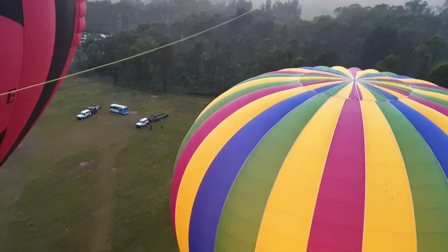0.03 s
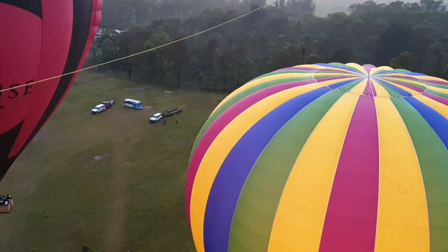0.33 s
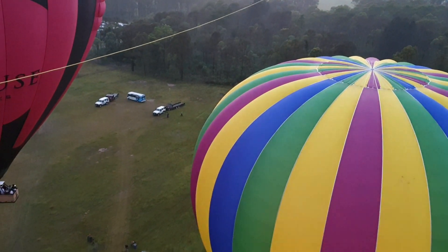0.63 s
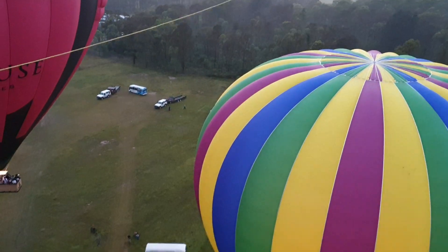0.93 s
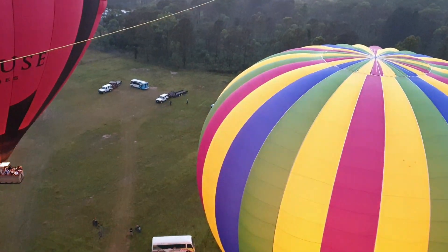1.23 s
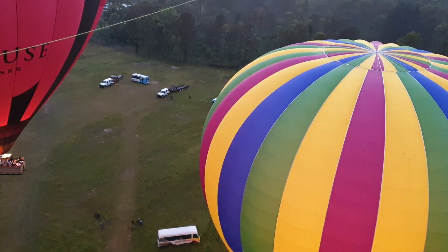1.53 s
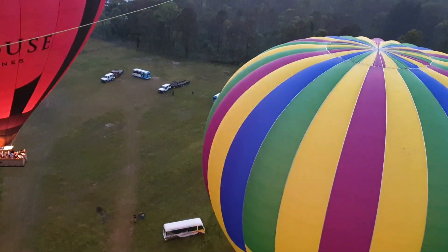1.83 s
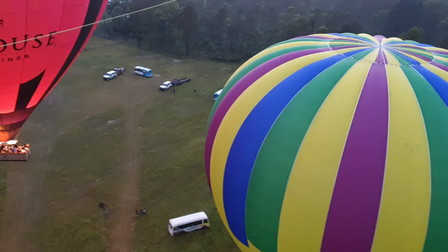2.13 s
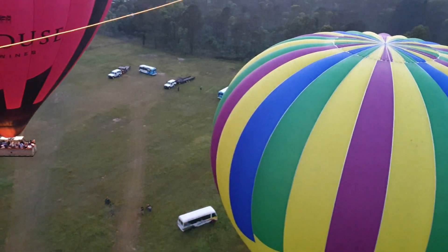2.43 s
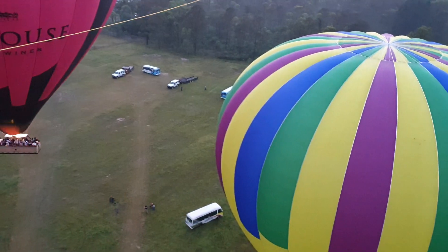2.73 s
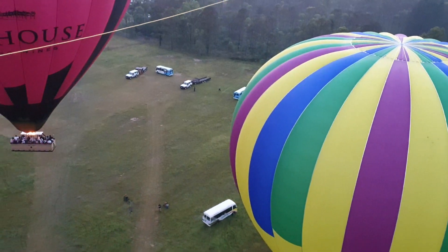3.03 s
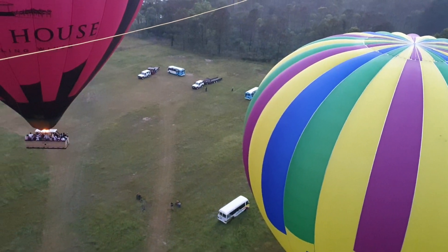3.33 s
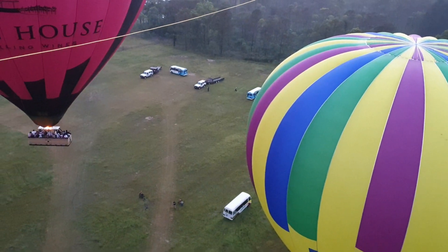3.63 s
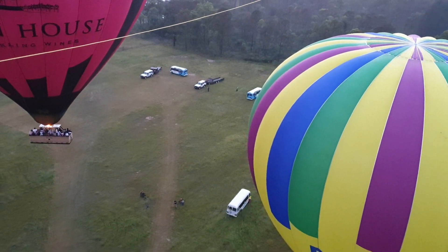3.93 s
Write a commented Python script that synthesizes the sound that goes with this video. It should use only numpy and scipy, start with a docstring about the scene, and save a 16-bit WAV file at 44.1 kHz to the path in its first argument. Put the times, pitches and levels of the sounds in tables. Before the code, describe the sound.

A balloon gas burner roars close by in two blasts with a short pause between.

```python
"""Aboard a hot air balloon. The gas burner overhead is already roaring: its gas flow drives a fluttering
flame and hissing jets, which reach the left microphone first but are louder in the right.
Near 1 s it is throttled shut, the hiss going first and the rumble last. In the pause a neighbouring
balloon's burner comes up, far off, as the recorder's gain recovers. At 2.4 s the gas lights again with
a low whoomp; the roar is briefly louder, then eases as the gain pulls down. Both gain moves are drawn."""
import sys
import numpy as np
from scipy import signal
from scipy.fft import rfft, irfft, next_fast_len
from scipy.io import wavfile
from scipy.ndimage import uniform_filter1d, map_coordinates

SR = 44100
rng = np.random.default_rng(int(sys.argv[2]) if len(sys.argv) > 2 else 0)


def pcm_store(signal):
    """Save signal as 16-bit PCM."""
    levels = np.round(np.clip(np.atleast_2d(signal), -1, 1) * 32767)
    wavfile.write(sys.argv[1], SR, levels.astype(np.int16).T)


N = 176400

# Pulls of the valve. Each row: opening and start of closing in seconds, flame and jet levels in dB.
BURNS = [(-1, .935, -17.1, -23.8), (2.419, 5, -17, -23.9)]
# Tone of the flame, the jets and the far burner. Each row: frequency in Hz, relative level in dB.
FLAME_SPECTRUM = [(20, -26.2), (32, -16.4), (48, -5.7), (62, -2.6), (92, -5.7), (140, 0.0), (195, -4.7),
                  (310, -3.3), (385, -5.7), (432, -10.8), (490, -8.3), (600, -13.8), (690, -11.6),
                  (810, -17.7), (930, -14.2), (1130, -12.0), (1300, -13.8), (1600, -19.5), (1850, -22.7),
                  (2150, -20.6), (2650, -26.5), (2950, -26.2), (3450, -28.1), (4200, -30.7), (5500, -48),
                  (16000, -70)]
JET_SPECTRUM = [(20, -80), (3600, -32), (4600, -10.2), (5100, -6.1), (5750, -1.4), (6400, -0.9),
                (7200, 0.0), (7950, -2.7), (8550, -11.7), (9400, -13.5), (11000, -6.9), (12500, -4.5),
                (14000, -8.7), (15700, -15.6)]
FAR_SPECTRUM = [(20, -22.4), (55, 0.0), (110, -1.6), (250, -2.0), (350, -6.3), (460, -12.6), (600, -9.8),
                (730, -11.7), (950, -18.1), (1250, -16.9), (1900, -21.5), (3200, -22.7), (4500, -23.9),
                (6000, -22.7), (7300, -22.6), (8800, -30.1), (11000, -25.5), (13000, -29.1), (15500, -38.7)]
# Stereo width of each burner. Each row: frequency in Hz, left-right likeness from 0 (wide) to 1 (mono).
NEAR_LIKENESS = [(40, .99), (300, .997), (680, .96), (800, .6), (980, .94), (1350, .9), (1700, .6),
                 (2200, .75), (4200, .35), (6000, .62), (9000, .3), (14000, .33)]
FAR_LIKENESS = [(100, .99), (300, .97), (1100, .8), (2500, .3), (6000, .6), (14000, .45)]
# Panning of each burner. Each row: frequency in Hz, left minus right in dB.
NEAR_BALANCE = [(50, -2.1), (230, -0.9), (480, -4.2), (620, -1.9), (760, -7.5), (880, 10.4), (1170, -9.5),
                (1520, -13.3), (1750, -6.5), (2100, -9.4), (2700, -3.4), (3000, -8.4), (4200, -0.2),
                (5800, -9.2), (6800, -9.3), (7900, -16.4), (9500, -4.1), (12500, -7.8), (15500, -4.9)]
FAR_BALANCE = [(100, -2), (800, -4), (1030, 0), (1400, -4), (8000, -5), (14000, 0)]
# Sound bends round the microphones' housing. Each row: frequency in Hz, extra left lead in radians.
HOUSING_BEND = [(50, .3), (150, 0), (330, -.25), (560, .3), (720, 0), (900, -.6), (1050, -1.5), (1300, -.6),
                (1900, -.8), (2200, -.25), (2700, 1.1), (3300, .7), (4200, -.5), (7000, -.6), (12000, .1)]
# Slow rise and fall of the jets' hiss. Each row: time in seconds, level change in dB.
JET_DRIFT = [(0, .4), (.85, -.2), (1.03, -2), (1.2, 0), (2.47, -5.5), (2.54, -1.2), (2.65, -1.3),
             (2.83, .8), (3.35, .7), (3.55, -1.1), (4, -1.5)]
# The distant hiss comes up as the recorder's gain recovers after the loud burn, then wavers.
# Each row: time in seconds, level in dB.
FAR_HISS = [(1.24, -52.5), (1.35, -51.3), (1.5, -47.4), (1.78, -45.9), (1.97, -47.6), (2.15, -47.3),
            (2.38, -45.4)]
# Turning of the hand-held microphones. Each row: time in seconds, extra left lead in milliseconds.
SWAY = [(0, .023), (.45, 0), (1.6, .002), (1.87, .012), (2.38, -.021), (2.6, -.013), (3.1, -.025),
        (4, -.023)]

NEAR_LEAD_MS, FAR_LEAD_MS = .42, .238  # each burner reaches the left microphone sooner


def amp(db):
    """Decibels to gain."""
    return 10 ** (np.asarray(db) / 20)


def unit(x):
    """Scale to rms 1."""
    return x / np.sqrt(np.mean(x ** 2) + 1e-20)


def along(points, hz):
    """Read a frequency table on a log axis."""
    freqs, values = np.transpose(points)
    return np.interp(np.log(hz + 1), np.log(freqs + 1), values)


def envelope(points):
    """Read a time table at every sample."""
    return np.interp(np.arange(N) / SR, *np.transpose(points))


def wobble(db, hz):
    """A smooth random gain, about db deep, with hz knots a second."""
    return amp(db * map_coordinates(rng.standard_normal(4096), [np.arange(N) * hz / SR], mode="wrap"))


def filtered(x, response):
    """Filter x by a complex response of frequency."""
    size = next_fast_len(N + SR // 2)
    return irfft(rfft(x, size) * response(np.fft.rfftfreq(size, 1 / SR)), size)[..., :N]


def split(x, edge_hz):
    """Crossover: the lows and highs of x."""
    low = filtered(x, lambda hz: 1 / (1 + (hz / edge_hz) ** 4))
    return low, x - low


def patchy_noise(depth_db=1.1):
    """Two white noises whose gain drifts in patches of time and frequency."""
    spectra = signal.stft(rng.standard_normal((2, N)), nperseg=1024)[2]
    patches = uniform_filter1d(rng.standard_normal(spectra.shape[1:]), size=4, axis=0)
    patches = uniform_filter1d(patches, size=24, axis=1)
    return signal.istft(spectra * amp(depth_db * unit(patches)), nperseg=1024)[1][:, :N]


def rush(spectrum, likeness, balance, lead_ms):
    """Turbulent noise of rms 1, reaching the two microphones from one side."""
    def tone_and_width(hz):
        spread = np.arccos(np.clip(along(likeness, hz), 0, 1)) / 2
        return amp(along(spectrum, hz)) * [np.cos(spread), np.sin(spread)]

    def placement(hz):
        sign = np.array([[1], [-1]])
        gain = amp(sign * along(balance, hz) / 2)
        lead = along(HOUSING_BEND, hz) + 2 * np.pi * hz * lead_ms / 1000
        return gain / np.linalg.norm(gain, axis=0) * np.exp(1j * sign * lead / 2)

    mid, side = filtered(patchy_noise(), tone_and_width)
    return unit(filtered(np.array([mid + side, mid - side]), placement))


def flame(age, flow, ignition_s=.012, light_s=.002):
    """The flame catches small and grows; turbulence flutters its rumble and roar."""
    catch_db, grow_s = -9, .115
    overshoot_db, ease_s = 2.6, .3  # briefly louder, easing as the recorder's gain pulls down
    noise = rush(FLAME_SPECTRUM, NEAR_LIKENESS, NEAR_BALANCE, NEAR_LEAD_MS)
    rumble, roar = split(noise, edge_hz=420)
    body = rumble * flow ** .7 + amp(1) * roar * flow ** 1.1  # the rumble comes first and goes last
    lit = np.clip((age - ignition_s) / light_s, 0, 1)
    level_db = catch_db * np.clip(1 - age / grow_s, 0, 1) + overshoot_db * np.exp(-age / ease_s)
    return body * lit * amp(level_db) * wobble(db=.7, hz=80)


def jets(flow):
    """The gas jets give a rough, spitting hiss that needs full flow."""
    hiss = rush(JET_SPECTRUM, NEAR_LIKENESS, NEAR_BALANCE, NEAR_LEAD_MS)
    return hiss * flow ** 2.1 * amp(envelope(JET_DRIFT)) * wobble(db=.4, hz=300)


def near_burner(opens, closes, flame_db, jet_db, attack_s=.018, closing_s=.28):
    """One pull of the valve overhead: an unsteady gas flow feeds both flame and jets."""
    t = np.arange(N) / SR
    age = np.maximum(t - opens, 0)
    opening = 1 - np.exp(-age / attack_s)
    closing = 1 - np.clip((t - closes) / closing_s, 0, 1) ** 1.25  # slowly at first, then faster
    flow = opening * closing
    burn = amp(flame_db) * flame(age, flow) + amp(jet_db) * jets(flow)
    return burn * wobble(db=.3, hz=22)


def far_burner(roar_over_hiss_db=8.9, echo_ms=1.6, echo_gain=.13):
    """The neighbour burns throughout: a dull roar and a thin hiss that waver through the open air."""
    hiss_db = envelope(FAR_HISS)
    usual_db = np.median(np.transpose(FAR_HISS)[1])
    roar_db = usual_db + roar_over_hiss_db + .6 * (hiss_db - usual_db)  # comes up with the gain too
    direct = rush(FAR_SPECTRUM, FAR_LIKENESS, FAR_BALANCE, FAR_LEAD_MS)
    # A reflection close to the microphones colours the tone.
    coloured = filtered(direct, lambda hz: 1 + echo_gain * np.exp(-2j * np.pi * hz * echo_ms / 1000))
    roar, hiss = split(coloured, edge_hz=2000)
    roar = unit(roar) * amp(roar_db) * wobble(db=.7, hz=14)
    hiss = unit(hiss) * amp(hiss_db) * wobble(db=.3, hz=12)
    return roar + hiss


def whoomp(opens, peak_db=-14.5, pitch_hz=57, rise_s=.015, delay_s=.023):
    """The first gas catches fire and pushes the air a few times."""
    age = np.maximum(np.arange(N) / SR - opens - delay_s, 0)
    swell = age / rise_s * np.exp(1 - age / rise_s)
    return amp(peak_db) * swell * np.sin(2 * np.pi * pitch_hz * age)


def sway(stereo):
    """The hand-held microphones turn a little, sliding left against right in time."""
    shift = envelope(SWAY) / 1000 * SR / 2  # samples, half the lead on each side
    return np.array([map_coordinates(channel, [np.arange(N) + sign * shift], order=5, mode="mirror")
                     for channel, sign in zip(stereo, (1, -1))])


def scene():
    """The burner overhead and its distant neighbour, in a gently swaying stereo image."""
    overhead = sum(near_burner(*pull) + whoomp(pull[0]) for pull in BURNS)
    return sway(overhead + far_burner())


def record(dry, top_hz=15750):
    """A hard band limit cuts the very top of the hiss."""
    return filtered(dry, lambda hz: hz < top_hz)


dry = scene()
out = record(dry)
pcm_store(out)
```